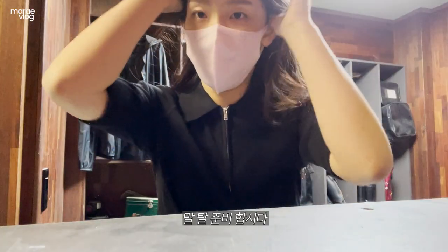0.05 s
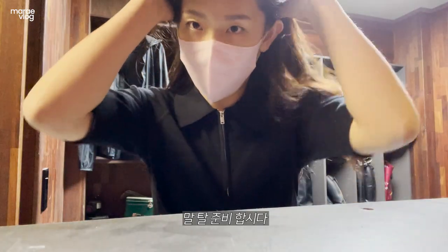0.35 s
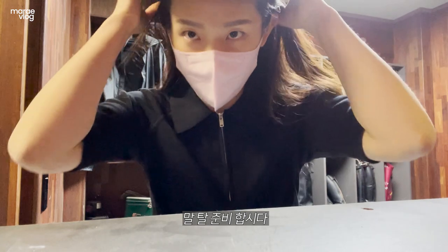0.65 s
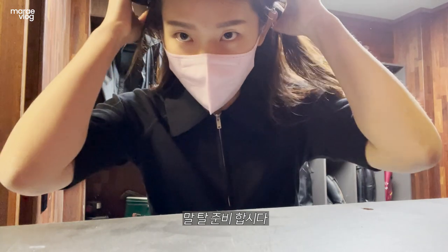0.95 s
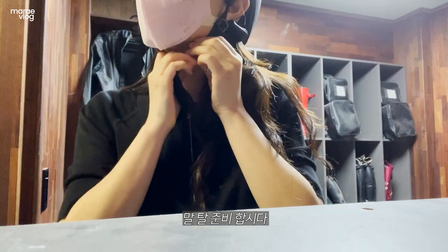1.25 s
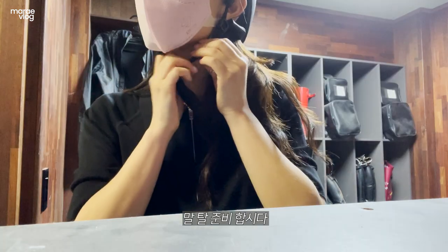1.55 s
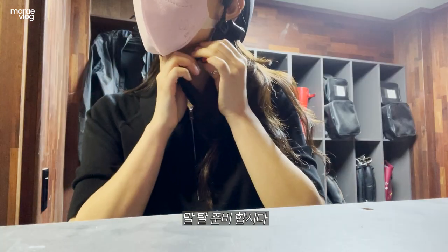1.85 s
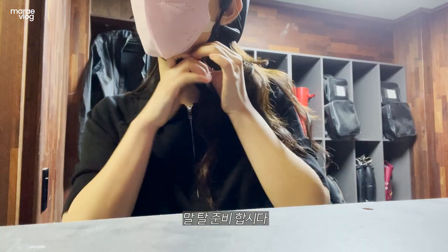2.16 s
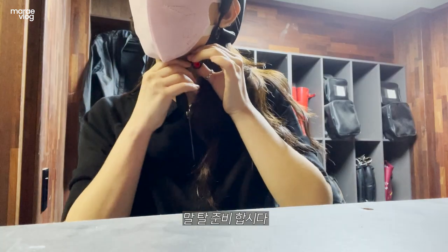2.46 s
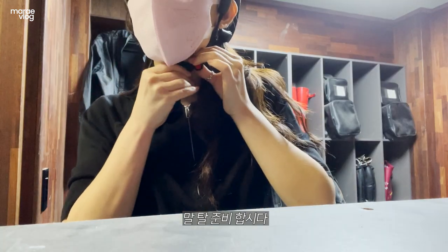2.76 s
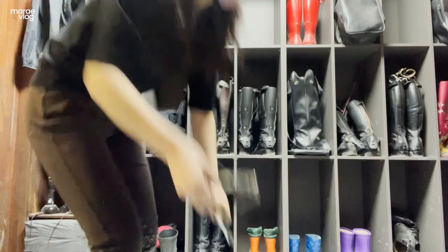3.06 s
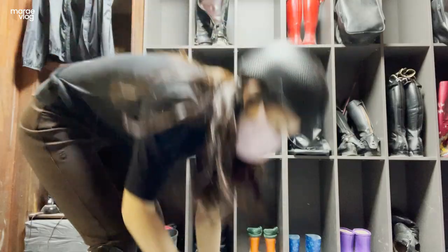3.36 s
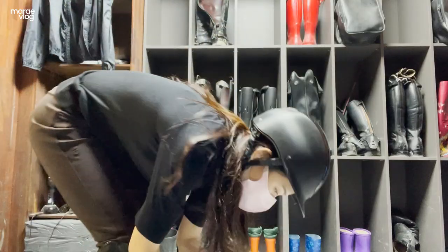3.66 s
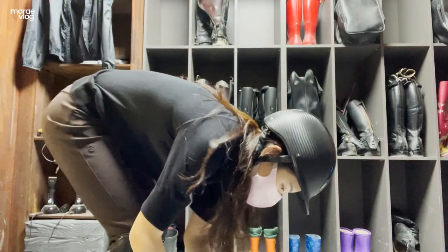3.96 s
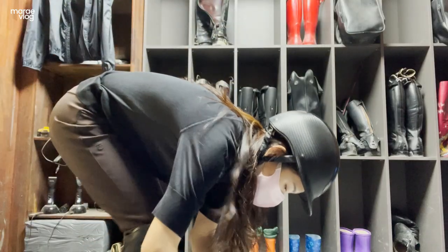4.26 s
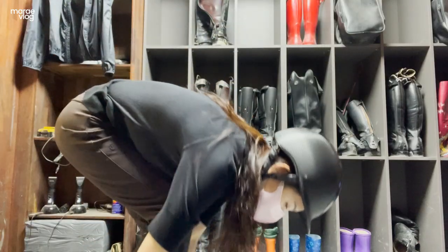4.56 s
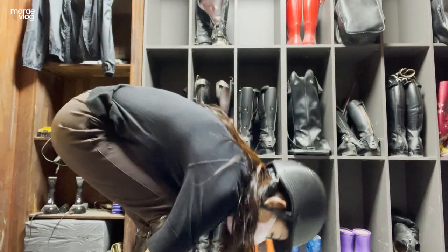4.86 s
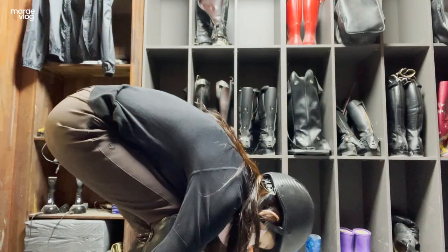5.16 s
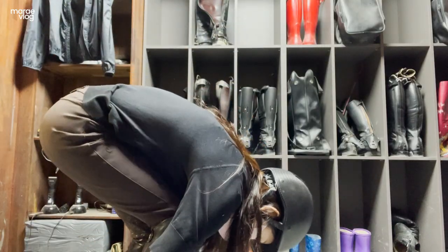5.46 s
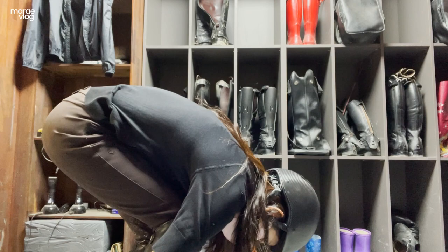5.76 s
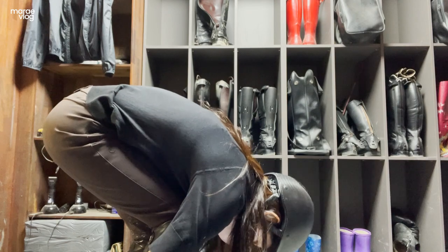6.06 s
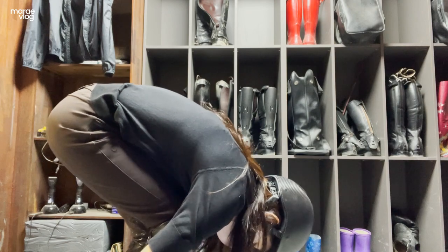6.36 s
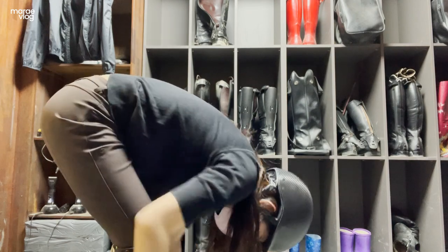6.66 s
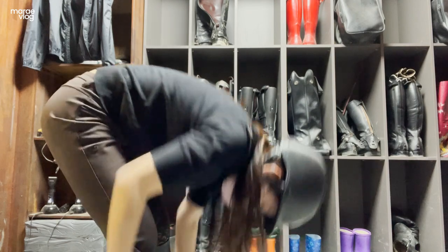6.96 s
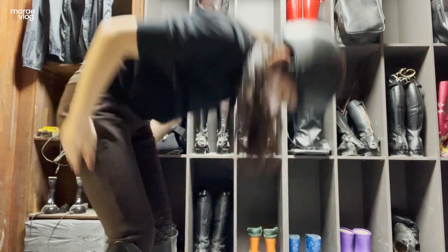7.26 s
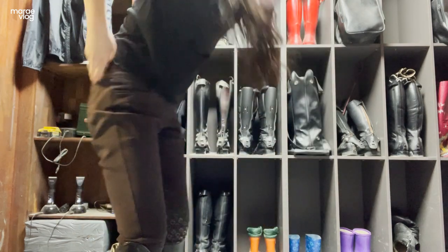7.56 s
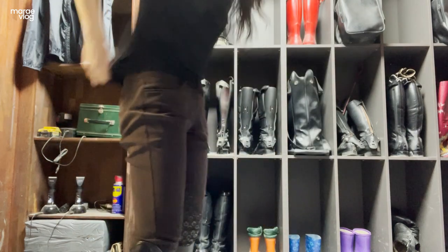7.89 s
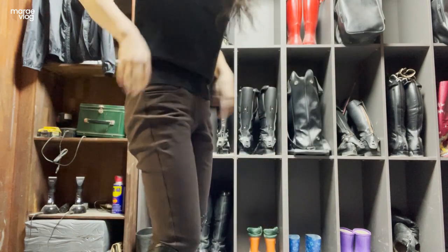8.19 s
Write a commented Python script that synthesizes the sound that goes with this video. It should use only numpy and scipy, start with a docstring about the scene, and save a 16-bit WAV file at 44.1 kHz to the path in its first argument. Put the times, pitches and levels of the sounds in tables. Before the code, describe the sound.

A rider pulls on a helmet with soft bumps and a faint strap rub, then fastens the buckle right by the microphone: a quick run of crisp plastic clicks and one more after a pause. A footstep follows, then a bright metal clack with a bounce and hollow wooden knocks. The rest is quieter, with fastener ticks, a few slaps on boot leather, rustling cloth and knocking floorboards in a small room with little echo.

```python
"""A rider gets dressed in a small wood-lined tack room. Clothes rustle and the boards rumble under
shifting weight as a padded helmet is pushed on, rubbing and bumping. Fasteners tick, the chin strap
drags through its guides and, close by, the buckle's plastic teeth ratchet shut. Further back a boot
scuffs and lands, and metal-fitted gear clacks onto the wooden floor. The rider bends down, slaps
the boot's leather shaft and stands up again on knocking boards."""
import sys
import numpy as np
from scipy import signal
from scipy.fft import rfft, irfft
from scipy.io import wavfile
from scipy.ndimage import uniform_filter1d, map_coordinates

SR = 44100
rng = np.random.default_rng(int(sys.argv[2]) if len(sys.argv) > 2 else 0)


def persist_wave(psi):
    """Save psi, clipped to +-1, as 16-bit WAV."""
    counts = np.round(np.clip(psi, -1, 1) * 32767).astype(np.int16)
    wavfile.write(sys.argv[1], SR, np.atleast_2d(counts).T)


N = 371763
T = np.arange(N) / SR
HIT_S = T[:24576]  # time axis of one impact
HIT_MS = HIT_S * 1000
SIDE_SIGN = np.array([[1], [-1]])  # left, right


def undb(db):
    """Decibels to gain."""
    return 10 ** (np.asarray(db) / 20)


def unit(x):
    """Scale to unit energy."""
    return x / np.sqrt(np.sum(x ** 2))


def at_hz(points, hz):
    """Interpolate (freq_hz, value) points on a log-frequency axis."""
    freq_hz, value = np.transpose(points)
    return np.interp(np.log(hz + 1), np.log(freq_hz), value)


def colour(x, spectrum, tilt_db_per_oct=0, size=4096):
    """Minimum-phase filter of unit energy; the tilt acts above about 1 kHz."""
    hz = np.arange(size // 2 + 1) * SR / size
    gain = undb(at_hz(spectrum, hz) + tilt_db_per_oct * np.log2(1 + hz / 1000))
    cepstrum = irfft(np.log(gain))
    causal = np.r_[cepstrum[0], 2 * cepstrum[1:size // 2]]
    response = irfft(np.exp(rfft(causal, size)))
    return signal.fftconvolve(x, unit(response))[:len(x)]


def add(track, start_s, sound):
    """Mix a sound in at start_s."""
    start = max(int(start_s * SR), 0)
    part = sound[..., :N - start]
    track[..., start:start + part.shape[-1]] += part


def burst(fade_ms, rise_ms=0.93):
    """A contact: many tiny impacts that set in quickly and die away."""
    envelope = (1 - np.exp(-(HIT_MS / rise_ms) ** 2)) * np.exp(-HIT_MS / fade_ms)
    return unit(rng.standard_normal(len(HIT_S)) * envelope)


def click(fade_ms=0.8, rise_ms=0.35):
    """A clean break: a very short contact with a flat spectrum."""
    spectrum = rfft(burst(fade_ms, rise_ms))
    flat = irfft(spectrum / (np.abs(spectrum) + 1e-9))
    return unit(flat * (HIT_MS < 10 * fade_ms))


def ring(modes):
    """Decaying modes, each with a random sign."""
    return unit(sum(rng.choice([-1, 1]) * undb(db - 60 * HIT_S / t60_s) * np.sin(2 * np.pi * hz * HIT_S)
                    for hz, db, t60_s in modes))


def wander(rate_hz):
    """Smooth random curve with rate_hz new values a second."""
    hold = int(SR / rate_hz)
    held = np.repeat(rng.standard_normal(N // hold + 1), hold)
    return uniform_filter1d(held, hold)[:N]


def strokes(rows, rise_share=0.38, fall_db=18.5):
    """Limb speed: each move swells over rise_share of its length, then falls by fall_db per length."""
    power = np.zeros(N)
    for peak_s, length_s, level_db in rows:
        phase = (T - peak_s) / length_s
        swell = np.sin(np.pi / 2 * np.clip(1 + phase / rise_share, 0, 1))
        power += (swell * undb(level_db - fall_db * np.clip(phase, 0, 10))) ** 2
    return np.sqrt(power)


def fidget(level_db, from_s=4.6, until_s=6.4, rate_hz=12, spread_db=3.5):
    """Hands fumble at the boots: a faint wandering level while the rider is bent down."""
    bent = uniform_filter1d(1. * ((T > from_s) & (T < until_s)), int(SR / rate_hz))
    return bent * undb(level_db + spread_db * wander(rate_hz))


def friction(speed, spectrum, grain_db, grain_samples=24):
    """Fibres catch and slip in grains of random strength; speed sets the level."""
    strengths = undb(grain_db * rng.exponential(size=N // grain_samples + 1).clip(max=6))
    grains = np.repeat(strengths, grain_samples)[:N] * rng.standard_normal(N)
    return speed * np.sqrt(N) * unit(colour(grains, spectrum))


def rasp(speed, spectrum, grain_db, drift_share=0.02, slip_db=2.5):
    """Friction on a resonant part: the grip sticks and slips, and the resonances drift as it changes."""
    position = np.cumsum(1 + drift_share * wander(rate_hz=9))
    steady = friction(0.98, spectrum, grain_db)
    drifting = map_coordinates(steady, [position], order=3, mode="mirror")
    return speed * undb(slip_db * wander(rate_hz=55)) * drifting


# Room decay: freq_hz, t60_s
ROOM_DECAY = [(100, 0.043), (260, 0.26), (700, 0.19), (1800, 0.2), (5000, 0.19), (10000, 0.33),
              (15000, 0.043)]


def reflections(tail_db=-27, tail_stretch=4.07, build_ms=3, alike_hz=300):
    """Dense echoes off the shelves with a weak longer tail; the bass is alike on both sides."""
    hz = np.arange(len(HIT_S) // 2 + 1) * SR / len(HIT_S)
    mid, side = rfft(rng.standard_normal((2, len(HIT_S))))
    alike = 0.6 / (1 + (hz / alike_hz) ** 2)
    noise = mid * np.sqrt(1 + alike) + side * np.sqrt(1 - alike) * SIDE_SIGN
    edges_hz = np.r_[0, 125 * 2 ** np.arange(8), SR / 2]
    out = 0
    for lo, hi in zip(edges_hz, edges_hz[1:]):
        band = irfft(noise * (hz >= lo) * (hz < hi))
        fall_db = -60 * HIT_S / at_hz(ROOM_DECAY, (lo + hi) / 2)
        out = out + band * (undb(fall_db) + undb(tail_db + fall_db / tail_stretch))
    build_up = 1 - np.exp(-(HIT_MS / build_ms) ** 2)
    return np.sqrt(2) * unit(out * build_up)


def in_room(x, echoes, room_db, left_lag_samples=4):
    """Direct sound, slightly late on the left, plus echoes at room_db against it."""
    response = undb(room_db) * echoes
    response[0, left_lag_samples] += 1
    response[1, 0] += 1
    response /= np.sqrt(1 + undb(2 * room_db))
    return signal.fftconvolve(x[None], response, axes=1)[:, :len(x)]


# Room hush: freq_hz, gain_db
AIR_SPECTRUM = [(22, -20), (60, 7.5), (110, -5), (230, -4.5), (350, -16.5), (600, -12.5), (950, -16.5),
                (3000, -28.5), (6000, -30.5), (9500, -28), (11500, -40), (16000, -40.5)]


def air():
    """The still room's faint hush."""
    hush = colour(rng.standard_normal(N), AIR_SPECTRUM)
    return undb(-71.5) * in_room(hush, reflections(), room_db=1.4)


# Sliding cloth, rubbing folds: peak_s, length_s, level_db
SWISH_STROKES = [(.12, 0.45, -59), (.64, 0.23, -62), (.81, 0.07, -63), (1.13, 0.06, -68.5),
                 (1.49, 0.036, -58), (1.67, 0.029, -70), (3.06, 0.068, -58.5), (3.28, 0.39, -59),
                 (3.48, 0.11, -60.5), (4.33, 0.32, -72.5), (4.48, 0.047, -58.5), (4.82, 0.15, -70.5),
                 (5.02, 0.44, -68), (5.56, 0.13, -70.5), (5.8, 0.11, -69), (6.37, 0.064, -68.5),
                 (6.71, 0.064, -74.5), (6.84, 0.074, -57.5), (6.99, 0.21, -59.5), (7.15, 0.14, -54),
                 (7.34, 0.22, -50), (7.61, 1, -66.5), (7.93, 0.1, -65), (8.09, 0.14, -61.5)]
FOLD_STROKES = [(.02, 0.19, -59), (.62, 0.39, -59.5), (3.04, 0.099, -55), (3.27, 0.37, -53.5),
                (4.3, 0.2, -67.5), (5, 0.29, -72.5), (5.32, 0.35, -66.5), (5.79, 0.065, -67),
                (6.06, 0.12, -68), (6.36, 0.079, -74), (7.04, 1, -56.5), (7.33, 0.16, -46.5),
                (7.6, 0.42, -58.5), (8.2, 0.44, -57.5)]
# Swish, fold rub, tick of a crease or fastener: freq_hz, gain_db
SWISH_SPECTRUM = [(800, -11), (1600, -12), (2200, -5.5), (3000, -7), (3900, -7), (6000, -12), (9300, -6.5),
                  (11500, -18.5), (15500, -10.5)]
FOLD_SPECTRUM = [(110, -24.5), (240, -4), (380, -18.5), (500, -6.5), (600, 5), (760, -9), (930, 1.5),
                 (1250, -9), (1540, -0.5), (1850, -9.5), (2800, -16.5), (5000, -20), (9000, -50)]
TICK_SPECTRUM = [(150, -19.5), (600, -9.5), (1000, -3.5), (3300, 0.5), (6000, -2.5), (9500, -0.5),
                 (16000, -22)]


def clothes():
    """Cloth swishes and its creases crackle as it slides; heavy folds rub."""
    sliding = np.hypot(strokes(SWISH_STROKES, rise_share=0.84, fall_db=22.5), fidget(-86.5))
    folding = np.hypot(strokes(FOLD_STROKES), fidget(-79.5))
    swish = friction(sliding, SWISH_SPECTRUM, grain_db=4.5)
    rub = friction(folding, FOLD_SPECTRUM, grain_db=2, grain_samples=48)
    creases = friction(undb(-8) * sliding, TICK_SPECTRUM, grain_db=6)
    return in_room(swish + rub + creases, reflections(), room_db=5.5)


# Padding on hair, hands on the shell: peak_s, length_s, level_db
PADDING_STROKES = [(.2, 0.22, -59), (.66, 0.12, -53.5)]
SCRAPE_STROKES = [(.66, 0.28, -64), (.8, 0.27, -58), (1.13, 0.17, -70)]
# Padding rub, shell scrape, shell knock: freq_hz, gain_db
PADDING_SPECTRUM = [(100, -21.5), (170, -19), (300, -7), (480, -12), (900, -14.5), (6000, -60)]
SCRAPE_SPECTRUM = [(200, -19.5), (355, -3), (520, -21), (1150, -16), (1400, -2), (1500, 1.5), (1610, -8),
                   (1800, -17), (2700, -9), (4500, -16), (10000, -32.5)]
BUMP_SPECTRUM = [(180, -9), (380, -9), (520, 1), (740, -4), (950, -1), (1280, -2), (1650, -11), (2400, -12),
                 (4000, -19), (12000, -33)]
# Helmet bumps: start_s, thump_db, knock_db
HELMET_BUMPS = [(0.097, -34, -19), (0.19, -42, -19), (0.416, -19, -17), (0.651, -40, -27)]
# Padded helmet's thump: pitch_hz, gain_db, t60_s
HELMET_MODES = [(126, 2, 0.048), (193.5, 1.5, 0.037), (291.7, -1, 0.0081), (537, 4, 0.0082)]


def helmet():
    """The helmet is pushed over the hair: the padding rubs and thumps, the shell scrapes and knocks."""
    out = friction(strokes(PADDING_STROKES), PADDING_SPECTRUM, grain_db=7, grain_samples=48)
    out += rasp(strokes(SCRAPE_STROKES), SCRAPE_SPECTRUM, grain_db=2.5)
    for start_s, thump_db, knock_db in HELMET_BUMPS:
        thump = undb(thump_db) * ring(HELMET_MODES)
        knock = undb(knock_db) * colour(burst(fade_ms=6, rise_ms=6), BUMP_SPECTRUM)
        add(out, start_s, thump + knock)
    return in_room(out, reflections(), room_db=-0.5)


# Weight shifts: peak_s, length_s, level_db
WEIGHT_SHIFTS = [(.28, 0.23, -59.5), (.43, 0.13, -59), (1.265, 0.05, -48.5), (1.34, 0.34, -55.5),
                 (1.53, 0.32, -62), (1.66, 0.054, -56), (2.28, 0.33, -61), (2.49, 0.16, -63),
                 (2.9, 0.11, -62.5), (3.135, 0.092, -43), (3.42, 0.48, -58.5), (3.88, 0.19, -50),
                 (4.06, 0.54, -64.5), (4.94, 0.068, -62), (5.39, 0.089, -63), (5.7, 0.15, -62),
                 (5.82, 0.089, -57.5), (6, 0.11, -63), (6.2, 0.067, -60.5), (6.58, 0.05, -51.5),
                 (6.66, 0.15, -56.5), (6.85, 0.065, -48), (7.02, 0.73, -54.5), (7.23, 0.052, -47.5),
                 (7.4, 0.085, -68), (7.73, 0.25, -54.5), (8.06, 0.099, -63), (8.24, 0.23, -61)]
# Loaded boards: freq_hz, gain_db
RUMBLE_SPECTRUM = [(22, -23), (42, -22.5), (58, -6.5), (68, 4), (80, -6), (100, -3), (120, -7),
                   (160, -15.5), (230, -13), (400, -52)]


def board_rumble(jolt_s=0.06, tug_db=-64.5, blow_db=-47):
    """Shifting weight, buckle tugs and floor blows shake the boards, nearly alike on both sides."""
    jolts = [(start_s + jolt_s / 2, jolt_s, level_db + jolt_db)
             for events, jolt_db in [(BUCKLE_TEETH, tug_db), (FLOOR_BLOWS, blow_db)]
             for start_s, level_db, *_ in events]
    load = np.hypot(strokes(WEIGHT_SHIFTS + jolts, rise_share=0.35, fall_db=18), fidget(-72))
    mid, side = (friction(load, RUMBLE_SPECTRUM, grain_db=-5) for _ in range(2))
    return mid + undb(-7.5) * side * SIDE_SIGN


# Boot scuffs: start_s, relative_db, length_ms, tilt_db_per_oct
BOOT_SCUFFS = [(0.412, -50, 3.9, -4), (3.093, -25.5, 21, 3), (4.455, -59, 7.6, 2), (6.807, -59, 4.6, -5)]
# Brushing sole: freq_hz, gain_db
SCUFF_SPECTRUM = [(500, -17.5), (1000, 2.5), (1550, -3), (2800, -6.5), (3600, -4.5), (6800, -12.5),
                  (11400, -6), (12600, -14.5), (15300, -5.5), (16500, -20)]


def scuffs():
    """Soles and leather brush past in short strokes."""
    out, echoes = np.zeros((2, N)), reflections()
    for start_s, relative_db, length_ms, tilt_db_per_oct in BOOT_SCUFFS:
        contact = burst(fade_ms=0.58 * length_ms, rise_ms=0.9 * length_ms)
        brush = colour(contact, SCUFF_SPECTRUM, tilt_db_per_oct)
        add(out, start_s, undb(relative_db + 29) * in_room(brush, echoes, room_db=0))
    return out


# Footfalls: start_s, relative_db, heel_hz, boom_vs_heel_db
FOOTFALLS = [(0.414, -56, 335, 8.5), (3.111, -19, 586, -6), (3.525, -36.5, 247, 2), (3.678, -38, 236, 7.5),
             (6.557, -50, 132, -5.5), (6.811, -42.5, 209, -7), (6.83, -53, 393, -16),
             (6.851, -37, 178, -28), (6.915, -42, 184, -8), (7.228, -43, 189.7, -32),
             (7.678, -57, 196, 1.5)]
# Booming boards: freq_hz, gain_db
BOOM_SPECTRUM = [(22, -38.5), (45, -23), (70, -9.5), (120, -18), (180, 1.5), (245, 4), (320, -16),
                 (450, -11), (900, -22), (3000, -52.5)]


def steps(heel_t60_s=0.055):
    """The heel gives a short hollow thud and the boards boom under it."""
    out, echoes = np.zeros((2, N)), reflections()
    for start_s, relative_db, heel_hz, boom_vs_heel_db in FOOTFALLS:
        heel = in_room(ring([(heel_hz, 0, heel_t60_s)]), echoes, room_db=-0.38)
        boom = colour(burst(fade_ms=9.1, rise_ms=1.1), BOOM_SPECTRUM)
        boards = in_room(boom, echoes, room_db=0.98)
        step = unit(heel) + undb(boom_vs_heel_db) * unit(boards)
        add(out, start_s, undb(relative_db + 29.5) * step)
    return out


# Fastener ticks: start_s, level_db, tilt_db_per_oct, room_db
FASTENER_TICKS = [(0.52, -27.5, -8, 1), (1.434, -36, -1.5, -7), (1.623, -28, -9, -1), (1.667, -42, 0, 2),
                  (3.045, -36.5, -1, -3), (3.474, -27, 2.5, 10), (4.289, -38.5, -4, -1),
                  (4.334, -34, 22, 2.5), (4.362, -33, -3, 3), (4.415, -27, 1, -1), (4.464, -23, 10, 12),
                  (4.522, -28, -1, 2), (4.545, -22, 0, 0), (4.735, -40.5, -6, 1), (4.87, -36, 0.5, 1.5),
                  (5.047, -35.5, -6.5, -2), (5.56, -37.5, -4.5, 3), (6.058, -39, -3.5, -3),
                  (6.374, -42, -7, 2), (6.817, -18, -5, -1.5), (7.105, -26, -9, 3)]


def fasteners():
    """Straps and small fasteners tick on brief contact."""
    out, echoes = np.zeros((2, N)), reflections()
    for start_s, level_db, tilt_db_per_oct, room_db in FASTENER_TICKS:
        tick = colour(click(), TICK_SPECTRUM, tilt_db_per_oct)
        add(out, start_s, undb(level_db) * in_room(tick, echoes, room_db))
    return out


# Strap pulls: peak_s, length_s, level_db
STRAP_PULLS = [(1.254, 0.26, -51.5), (1.627, 0.042, -57), (2.14, 0.53, -59)]
# Strap in its guides: freq_hz, gain_db
STRAP_SPECTRUM = [(110, -6), (200, -6.5), (300, 2.5), (480, -7.5), (665, -4.5), (790, -15.5), (900, -11),
                  (1080, -20.5), (1295, -4), (1550, -24.5), (1900, -21), (2400, -23), (3200, -35),
                  (9000, -52.5)]


def chin_strap():
    """The strap grabs suddenly and drags through its guides with a hollow rub."""
    speed = strokes(STRAP_PULLS, rise_share=0.008, fall_db=12.5)
    return in_room(rasp(speed, STRAP_SPECTRUM, grain_db=0.5), reflections(), room_db=-2.5)


# Buckle teeth: start_s, level_db, room_db, latch_hz, catch_db, tooth_hz, tooth_db, thump_db
BUCKLE_TEETH = [(1.9617, 8.5, -9, 2950, 0, 14900, -3, -16), (1.9709, 10, -10.5, 3250, 2, 9900, -2, -12),
                (2.0013, 8, -9.5, 3450, -5, 14200, -3, -13), (2.0495, 11.5, -8.5, 2900, -8, 9500, 3, -24),
                (2.0965, 9.5, -10.5, 2700, -2, 14400, 1, -18),
                (2.6143, 10.5, -12.5, 3350, 2, 14800, -1, -20)]
# Tooth crack, ring of buckle and shell: freq_hz, gain_db
CRACK_SPECTRUM = [(60, -30), (130, -30.5), (300, -13.5), (700, -17), (1050, -3.5), (1500, -11.5),
                  (2500, -1.5), (4200, -1.5), (6400, 2), (7400, 1), (9300, 8), (12000, -3), (14700, -1.5),
                  (16500, -5.5)]
SHELL_SPECTRUM = [(300, -11.5), (1100, -7), (2000, -12), (4200, -7), (5250, -1.5), (6300, -24.5),
                  (9400, -15.5), (15000, -41.5)]


def buckle(catch_hz=5480, rise_ms=0.35, thump_lag_s=0.008):
    """Each tooth cracks free and rings with latch and catch; the shell rings, the strap's tug thumps."""
    out, echoes = np.zeros((2, N)), reflections()
    onset = np.minimum(HIT_MS / rise_ms, 1)
    for start_s, level_db, room_db, latch_hz, catch_db, tooth_hz, tooth_db, thump_db in BUCKLE_TEETH:
        parts = [(latch_hz, -6.5, 0.005), (catch_hz, catch_db, 0.005), (tooth_hz, tooth_db, 0.0026)]
        plastic = sum(undb(db) * ring([(hz, 0, t60_s)]) for hz, db, t60_s in parts)
        crack = colour(click(), CRACK_SPECTRUM)
        snap = unit(plastic * onset + undb(5) * crack)
        shell = colour(burst(fade_ms=90), SHELL_SPECTRUM)
        add(out, start_s, undb(level_db) * in_room(snap, echoes, room_db, left_lag_samples=3))
        add(out, start_s, undb(level_db - 26) * in_room(shell, echoes, room_db=0, left_lag_samples=3))
        add(out, start_s + thump_lag_s, undb(thump_db) * ring(HELMET_MODES))
    return out


# Breeches sliding: peak_s, length_s, level_db
BREECHES_STROKES = [(3.07, 0.11, -63), (3.3, 0.63, -61.5), (6.04, .25, -67.5), (6.24, .35, -73),
                    (6.45, 0.14, -71.5)]
# Tight cloth: freq_hz, gain_db
BREECHES_SPECTRUM = [(800, -27), (1900, -15), (2360, -2.5), (2550, -8.5), (2780, 2), (3050, -8.5),
                     (3800, -12), (5000, -26), (10000, -28)]


def breeches():
    """Tight cloth slides against itself with a thin hiss as the rider bends."""
    hiss = rasp(strokes(BREECHES_STROKES), BREECHES_SPECTRUM, grain_db=3.5)
    return in_room(hiss, reflections(), room_db=3)


# Metal strikes: start_s, relative_db, fade_ms, tilt_db_per_oct, room_db
METAL_STRIKES = [(3.52, -8, 1.6, 2.5, -1.5), (3.568, -13, 2.2, 0.5, -2)]
# Metal contact: freq_hz, gain_db
CLACK_SPECTRUM = [(900, -12), (1900, -5.5), (3300, 1), (4600, -1), (5400, -5.5), (6400, 3.5), (7700, 0),
                  (8350, 9), (10400, -3), (11400, -6), (12600, -6.5), (13900, 1), (15000, 0.5),
                  (16200, -18.5)]
# Ringing fittings: pitch_hz, gain_db, t60_s
FITTING_MODES = [(3579, 1, .22), (4910, -9, .22), (6112, -10, .22), (6598, -6, .17), (8173, -3, .17),
                 (8350, 4, .19), (8539, -1, .17), (13718, -3, .1), (13847, -2, .1)]


def metal_clacks():
    """Metal lands with a bright crack, rings and bounces once."""
    out, echoes = np.zeros((2, N)), reflections()
    for start_s, relative_db, fade_ms, tilt_db_per_oct, room_db in METAL_STRIKES:
        crack = in_room(colour(burst(fade_ms), CLACK_SPECTRUM, tilt_db_per_oct), echoes, room_db)
        fittings = in_room(ring(FITTING_MODES), echoes, room_db=-9.5)
        add(out, start_s, undb(relative_db + 21.5) * (crack + undb(-6) * fittings))
    return out


# Boots and gear on the floor: start_s, relative_db, cutoff_hz, fade_ms
FLOOR_BLOWS = [(3.522, -7, 2000, 1.5), (3.569, -15.5, 1880, 2.4), (3.674, -13, 1800, 9.8),
               (3.859, -39, 1480, 6), (4.218, -53.5, 1510, 5.4), (4.546, -47, 1400, 4),
               (4.777, -47.5, 1884, 7.5), (5.044, -53, 2023, 3.4), (5.39, -43, 1827, 2.2),
               (6.593, -48.5, 1166, 3.2), (6.667, -43.5, 1180, 1.3), (6.8, -53, 1500, 17),
               (6.835, -36, 2210, 7), (7.161, -28, 1660, 6.9), (7.221, -30, 1140, 3.4)]
# Dull body of a blow: freq_hz, gain_db
BLOW_SPECTRUM = [(80, -29), (230, -17), (340, -32), (480, -10), (600, 4), (760, -1), (950, -3.5),
                 (1280, -8), (1580, -6), (1900, -11), (4000, -8), (12000, -15.5)]
# Wooden floor: pitch_hz, gain_db, t60_s
BOARD_MODES = [(208.5, -3, 0.15), (246.4, -2.5, 0.22), (590, -4, 0.1), (641, 2.5, 0.13), (680, -1, 0.12),
               (797, 2, 0.13), (900, -1.5, 0.08), (1016, 4, 0.24), (1020, -1, 0.14), (1150, -5, 0.16),
               (1387, -8, .18), (1556, 4.5, 0.15), (1668, -6, 0.079)]


def floor_knocks():
    """Blows ring the floor; a soft contact takes the upper modes away."""
    out, echoes = np.zeros((2, N)), reflections()
    for start_s, relative_db, cutoff_hz, fade_ms in FLOOR_BLOWS:
        body = in_room(colour(burst(fade_ms, rise_ms=0.66), BLOW_SPECTRUM), echoes, room_db=0.8)
        boards = in_room(ring(BOARD_MODES), echoes, room_db=-2.8)
        softness = signal.butter(2, cutoff_hz, fs=SR, output="sos")
        knock = unit(signal.sosfilt(softness, body + undb(-10) * boards))
        add(out, start_s, undb(relative_db + 21.5) * knock)
    return out


# Hand slaps: start_s, level_db
BOOT_SLAPS = [(5.169, -21.5), (5.289, -22), (6.346, -35.5), (6.816, -15)]
# Leather shaft: freq_hz, gain_db
SLAP_SPECTRUM = [(200, -20), (550, -5.5), (950, 3.5), (1600, 0), (2300, -1), (3600, -7.5), (6000, -21.5),
                 (10000, -19.5), (16000, -29)]


def slaps():
    """Hands slap the boot's leather shaft."""
    out, echoes = np.zeros((2, N)), reflections()
    for start_s, level_db in BOOT_SLAPS:
        slap = colour(burst(fade_ms=4.8, rise_ms=0.49), SLAP_SPECTRUM)
        add(out, start_s, undb(level_db) * in_room(slap, echoes, room_db=4.9))
    return out


def scene():
    """All sources in the tack room, in stereo."""
    return (air() + clothes() + helmet() + board_rumble() + scuffs() + steps() + fasteners()
            + chin_strap() + buckle() + breeches() + metal_clacks() + floor_knocks() + slaps())


def record(dry, bass_hz=380, notch_hz=12100, low_cut_hz=38, top_hz=16400):
    """Microphone: bass leans right, treble is notched, deep rumble cut, peaks rounded, top cut."""
    bass = signal.sosfilt(signal.butter(1, bass_hz, fs=SR, output="sos"), dry)
    stereo = dry - 0.23 * bass * SIDE_SIGN
    stereo = signal.lfilter(*signal.iirnotch(notch_hz, Q=6, fs=SR), stereo)
    stereo = signal.sosfilt(signal.butter(1, low_cut_hz, "high", fs=SR, output="sos"), stereo)
    rounded = 0.8 * np.tanh(stereo / 0.8)
    return signal.sosfilt(signal.ellip(10, 0.2, 90, top_hz, fs=SR, output="sos"), rounded)


dry = scene()
out = record(dry)
persist_wave(out)
```